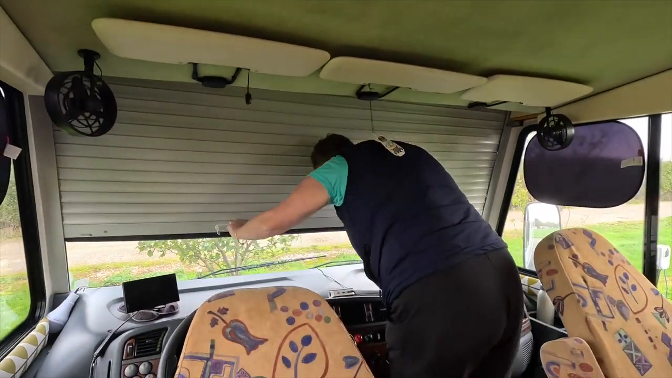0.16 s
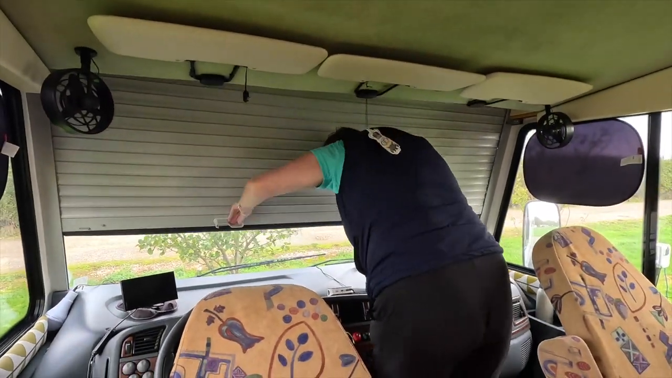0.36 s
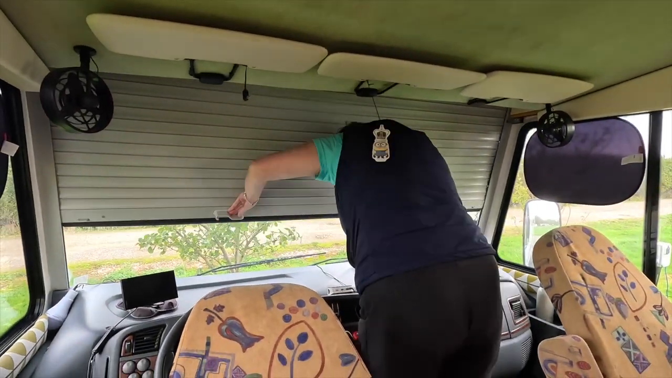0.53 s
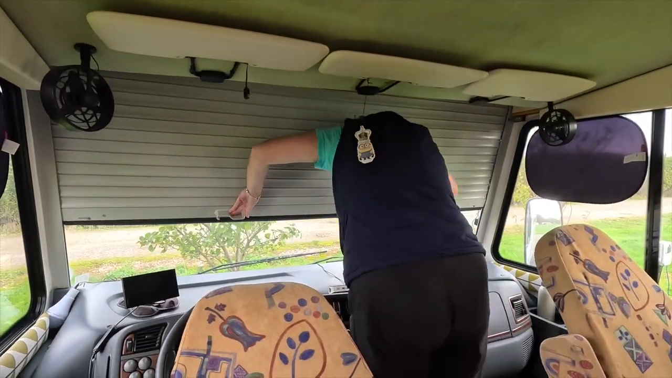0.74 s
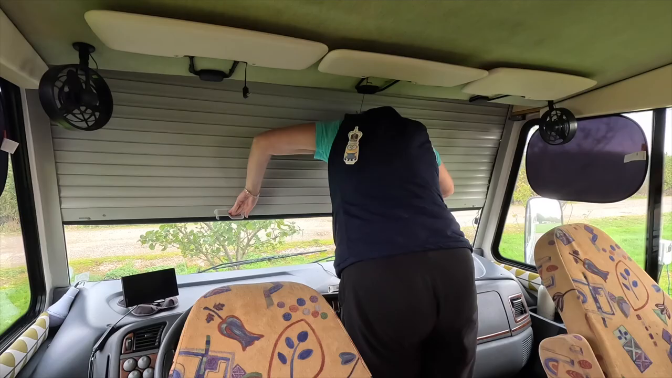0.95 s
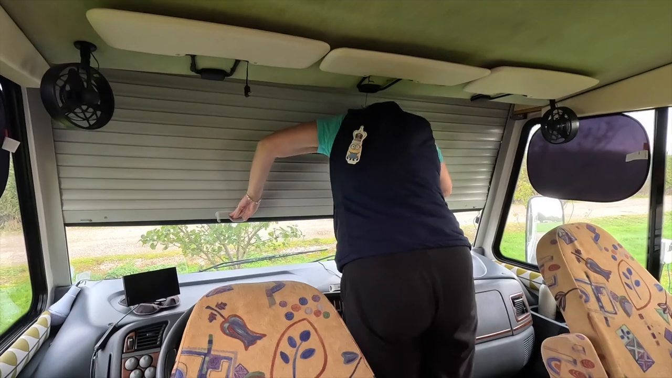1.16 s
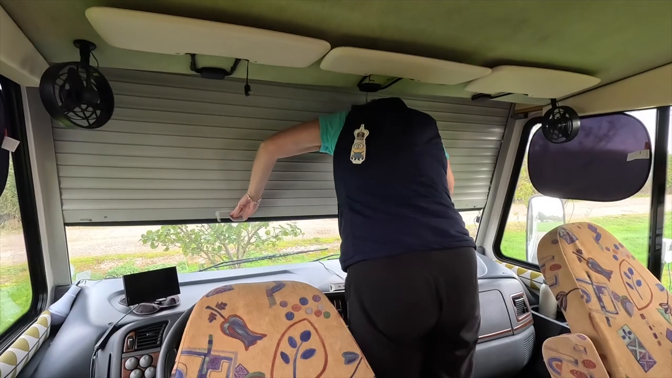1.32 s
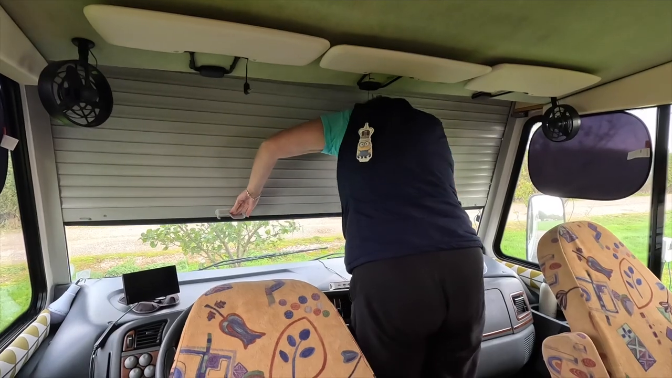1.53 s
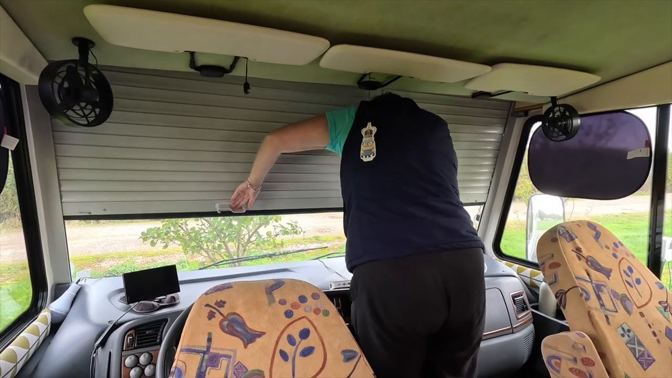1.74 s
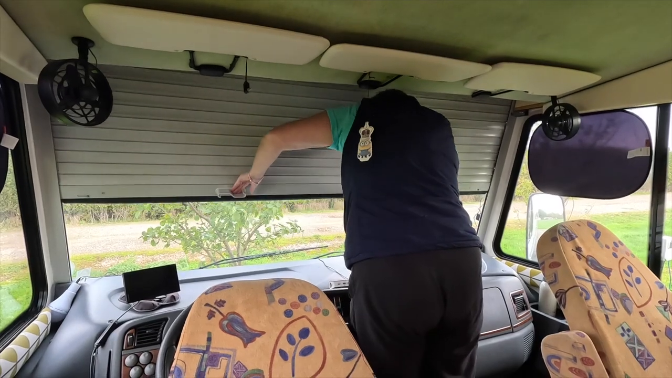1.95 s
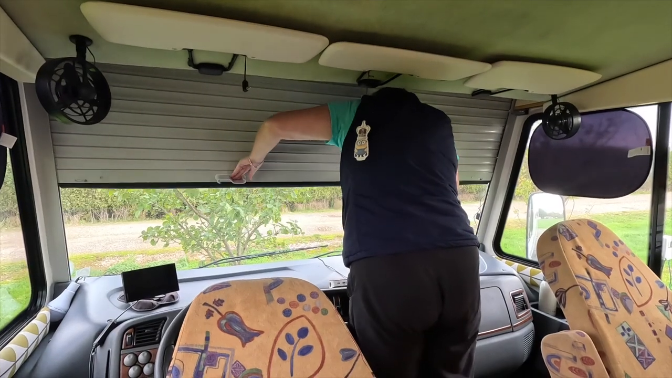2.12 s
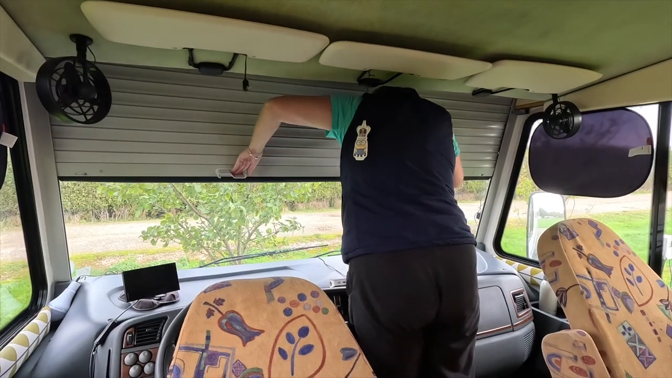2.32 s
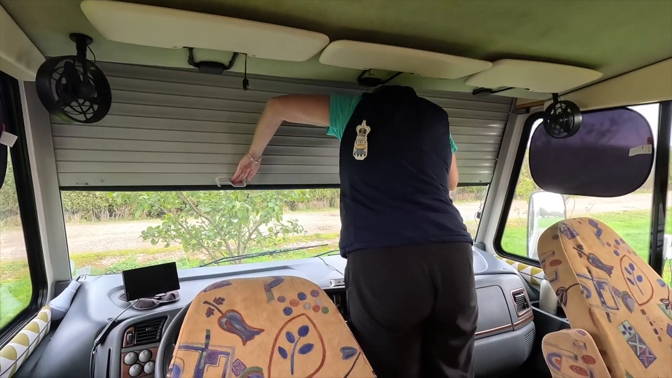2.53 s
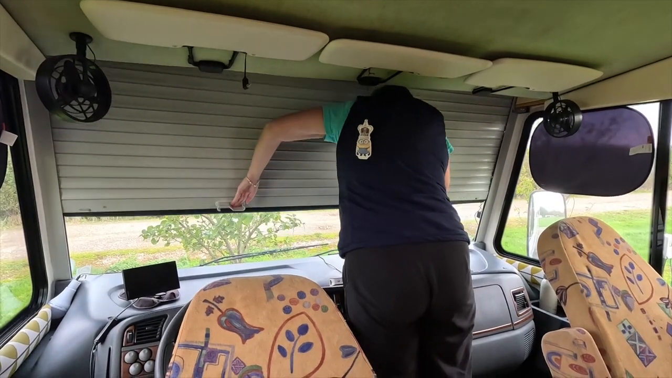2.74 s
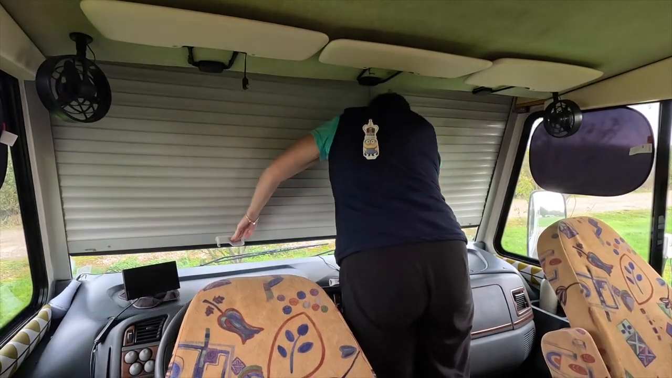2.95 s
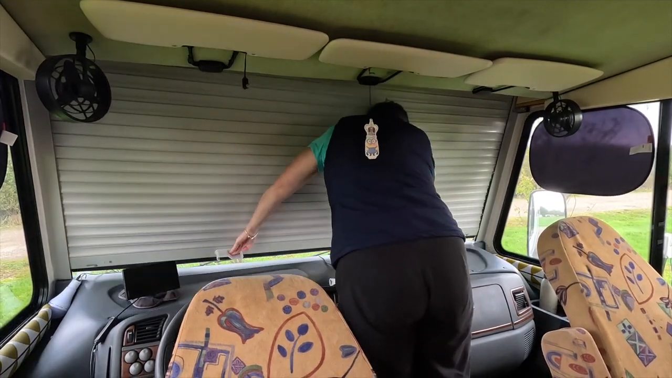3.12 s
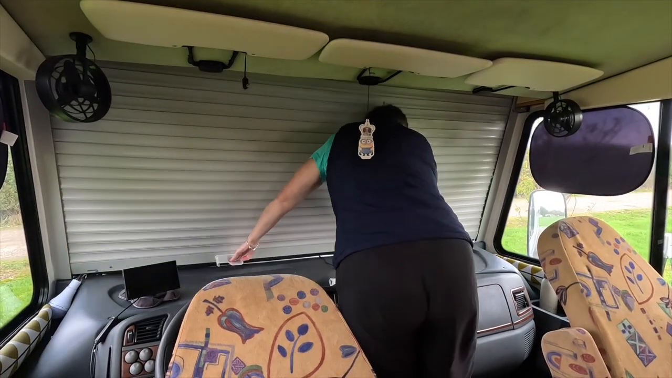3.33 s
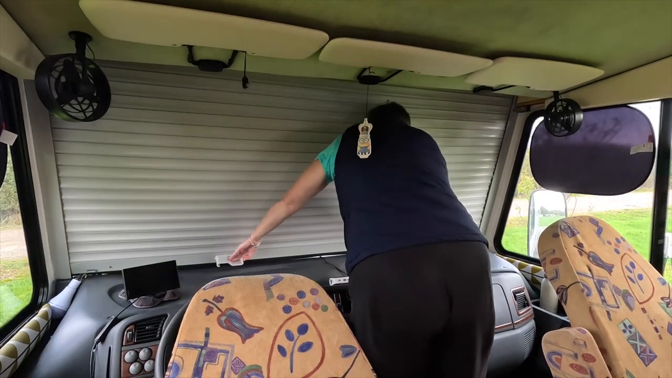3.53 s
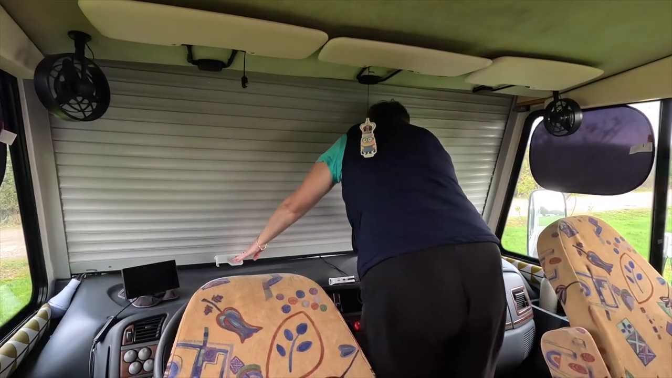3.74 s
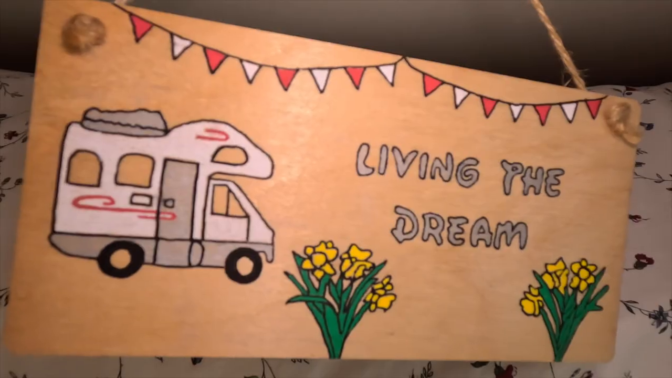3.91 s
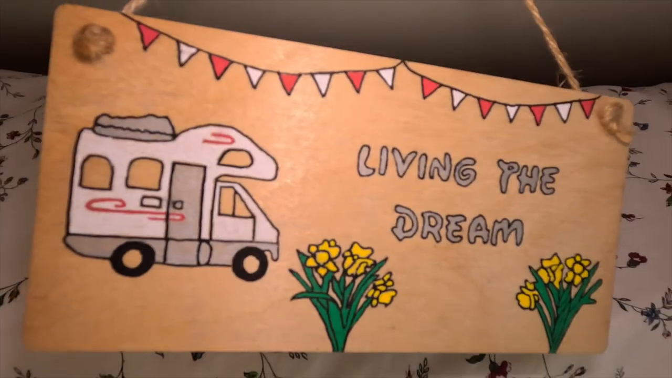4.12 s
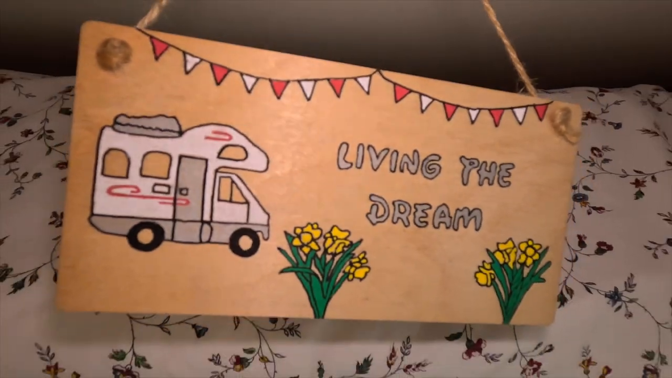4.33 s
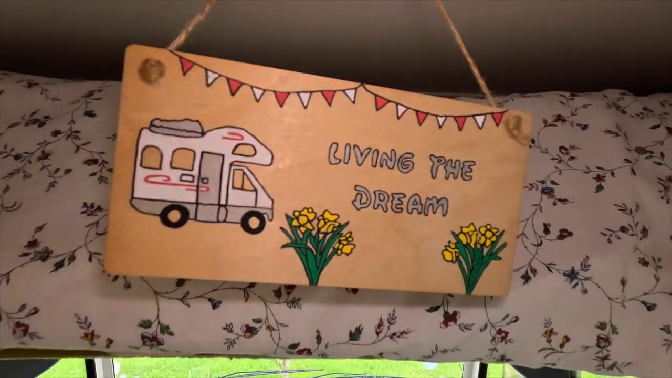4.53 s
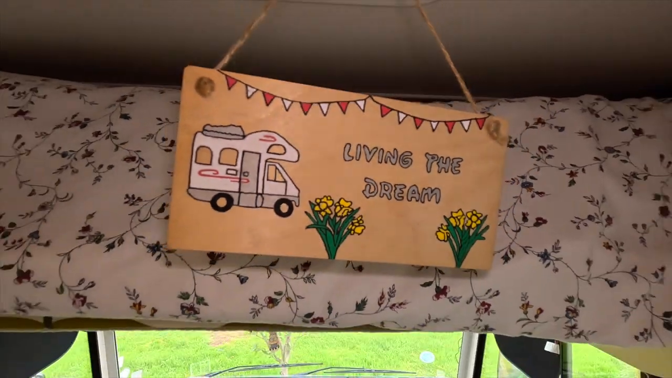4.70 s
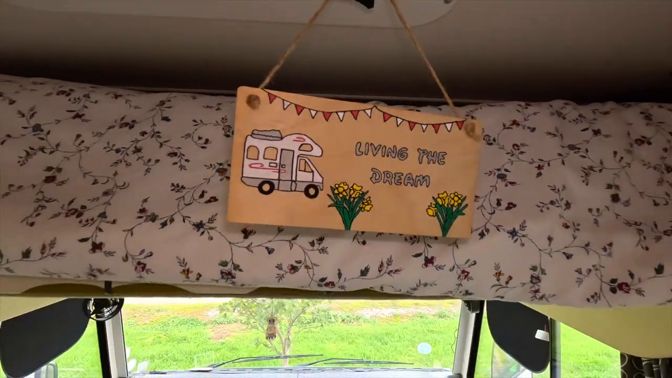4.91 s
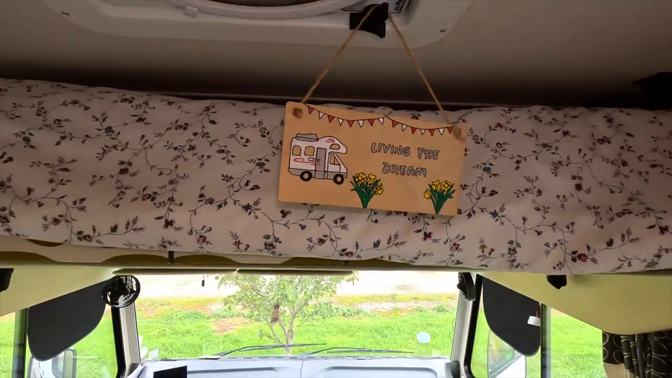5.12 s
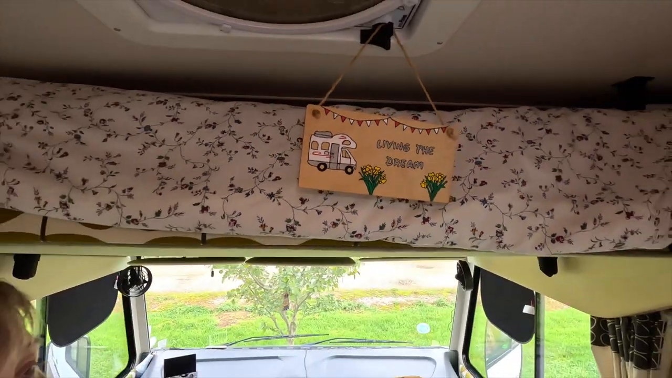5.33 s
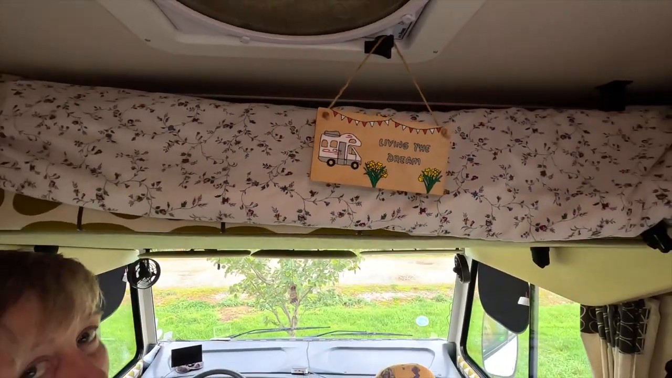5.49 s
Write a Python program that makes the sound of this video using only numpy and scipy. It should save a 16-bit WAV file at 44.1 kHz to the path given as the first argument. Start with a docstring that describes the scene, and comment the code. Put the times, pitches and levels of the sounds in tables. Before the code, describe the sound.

Inside a camper cab, a roller blind's slats clatter and scrape with hollow thumps, stopping abruptly before faint bumps and cloth rustle.

```python
"""A hand works a slatted roller blind up and down in a vehicle cab, a little way off.
Slats clack, scrape and rattle in their guides; the curtain thumps and booms like a loose panel.
The motion is loudest near 3 s, then hard slat edges snap past the guide in a quick run.
At 3.86 s the blind's sound cuts off, leaving the soft air of the cab.
From 4.5 s come a few soft bumps on padded trim, cloth rustles and two faint clacks."""
import sys
import numpy as np
from scipy import signal
from scipy.io import wavfile
from scipy.ndimage import uniform_filter1d

SR = 44100
rng = np.random.default_rng(int(sys.argv[2]) if len(sys.argv) > 2 else 0)


def wav_out(sig):
    """Save sig, one row per channel (or a flat mono array), as 16-bit PCM at SR to the path in sys.argv[1]."""
    wavfile.write(sys.argv[1], SR, np.round(np.clip(np.atleast_2d(sig).T, -1, 1) * 32767).astype(np.int16))


N = 249606
CUT_S, BAND_LIMIT_HZ = 3.863, 15500

# blind in motion: (time [s], curtain boom [dB], slat rattle [dB])
BLIND_TRAVEL = [(0, -42, -46.5), (0.24, -50, -54.5), (0.35, -42.5, -49), (0.47, -30.5, -39.5),
                (0.64, -43.5, -49), (1.1, -41.5, -46.5), (1.2, -47, -60), (1.28, -43, -49),
                (1.52, -43.5, -48.5), (1.62, -47, -53.5), (1.84, -35.5, -36.5), (1.95, -33, -43),
                (2.26, -31, -44), (2.37, -49, -50), (2.44, -48, -51), (2.58, -31, -37.5), (2.8, -24.5, -31),
                (3.1, -25.5, -36), (3.23, -35, -39), (3.302, -27, -38), (3.36, -44.5, -49.5),
                (3.56, -41, -41.5), (3.8, -54.5, -61)]
# slat knocks: (time [s], level [dB], centre [Hz], chatter t60 [s])
SLAT_CLACKS = [(0.03, -44, 3750, 0.11), (0.139, -47, 3000, 0.08), (0.157, -37, 2170, 0.018),
               (0.2535, -32, 3900, 0.08), (0.315, -45, 3557, 0.17), (0.415, -28.5, 2300, 0.17),
               (0.432, -28.5, 3260, 0.083), (0.509, -36.5, 4183, 0.05), (0.643, -43, 5159, 0.091),
               (0.714, -36, 5000, 0.17), (0.892, -36.5, 4700, 0.051), (1.03, -37.5, 1270, 0.032),
               (1.25, -40, 3400, 0.073), (1.294, -42, 3988, 0.076), (1.329, -42, 3500, 0.053),
               (1.374, -47, 3900, 0.08), (1.455, -32.5, 2230, 0.075), (1.482, -36.5, 3470, 0.059),
               (1.658, -39.5, 1610, 0.022), (1.692, -42, 3620, 0.44), (1.79, -37, 2700, 0.12),
               (1.836, -26.5, 1660, 0.065), (1.893, -35.5, 1200, 0.047), (2.055, -35.5, 1940, 0.41),
               (2.26, -34, 3570, 0.064), (2.322, -34, 1330, 0.042), (2.453, -41, 4223, 0.3),
               (2.499, -40, 3839, 0.051), (2.519, -27, 4700, 0.16), (2.681, -25.5, 3900, 0.19),
               (2.71, -28, 3830, 0.04), (2.94, -28, 2570, 0.14), (2.999, -28.5, 3050, 0.072),
               (3.075, -26, 1740, 0.062), (3.145, -35.5, 2361, 0.027), (3.225, -38, 3250, 0.076),
               (3.445, -31, 3150, 0.033), (3.473, -35, 1550, 0.03), (3.539, -31.5, 3630, 0.034),
               (3.605, -29, 2250, 0.026), (3.649, -42, 5300, 0.046), (3.692, -43, 4730, 0.17),
               (3.746, -48.5, 4429, 0.071), (3.817, -28, 2920, 0.023), (5.155, -48, 3800, 0.087),
               (5.299, -52.5, 1773, 0.11)]
# slat scrapes: (time [s], level [dB], centre [Hz], chatter t60 [s])
SLAT_SCRAPES = [(0.48, -41, 4346, 0.23), (0.57, -54, 4183, 0.19), (0.81, -51, 3523, 0.051),
                (1.056, -37.5, 3900, 0.15), (1.085, -30, 4160, 0.041), (1.72, -38, 4750, 0.16),
                (1.86, -37, 3760, 0.056), (1.968, -33, 2210, 0.14), (2.16, -29, 1950, 0.057),
                (2.59, -35, 3580, 0.13), (2.785, -26, 3800, 0.14), (3.832, -40.5, 4700, 0.028),
                (4.51, -53.5, 1660, 0.18), (4.545, -50.5, 1860, 0.62), (4.99, -48, 2208, 0.12)]
# edge snaps: (time [s], level [dB])
EDGE_TICKS = [(0.6523, -40), (0.714, -37.5), (2.5294, -25.5), (2.69, -25.5), (3.2116, -23.5),
              (3.2482, -23.5), (3.264, -25), (3.2748, -27), (3.2829, -27.5), (3.2916, -28), (3.3284, -43)]
# blows on the curtain: (time [s], level [dB], centre [Hz], chatter t60 [s])
CURTAIN_THUMPS = [(0.192, -44.5, 188, 0.5), (0.256, -30, 163, 0.019), (0.411, -13.5, 330, 0.089),
                  (0.435, -22.5, 184, 0.08), (0.51, -29, 262, 0.16), (1.092, -33.5, 790, 0.095),
                  (1.252, -36, 190, 0.05), (1.457, -27, 460, 0.062), (1.79, -29, 394, 0.048),
                  (1.812, -24, 390, 0.19), (1.836, -18.5, 161, 0.068), (2.0, -20.5, 206, 0.055),
                  (2.21, -30, 499, 0.11), (2.322, -31, 635, 0.086), (2.465, -34.5, 694, 0.23),
                  (2.523, -35, 167, 0.063), (2.61, -25.5, 346, 0.078), (2.79, -21.5, 500, 0.1),
                  (2.86, -25, 315, 0.29), (2.95, -23, 170, 0.11), (3.07, -17, 229, 0.077),
                  (3.135, -22, 360, 0.12), (3.185, -20.5, 364, 0.12), (3.443, -31.5, 314, 0.06),
                  (3.475, -35, 515, 0.13), (3.82, -37, 400, 0.07)]
# bumps on the trim: (time [s], level [dB], centre [Hz], chatter t60 [s])
TRIM_BUMPS = [(4.515, -37.5, 200, 0.12), (4.549, -34, 167, 0.12), (4.6, -48, 110, 0.15),
              (4.827, -40, 180, 0.054), (4.912, -42, 150, 0.26), (4.99, -42.5, 350, 0.12),
              (5.143, -34.5, 203, 0.075), (5.17, -48, 120, 0.2)]
# ring of one slat: (frequency [Hz], level [dB], base t60 [s])
SLAT_MODES = [(1238, 5, 0.098), (1650, 16, 0.0081), (1998, 8, 0.037), (2100, 16.5, 0.011), (2709, 0, 0.084),
              (2963, 3, 0.039), (3524, 5, 0.034), (3706, 17, 0.0083), (4113, -7, 0.085), (4384, 4.5, 0.013),
              (5970, 0, 0.017), (5520, 7, 0.0095), (6040, -24, 0.0047), (6360, 0.5, 0.0069),
              (7280, 1, 0.0054)]
# ring of the curtain: (frequency [Hz], level [dB], base t60 [s])
CURTAIN_MODES = [(79, -21, 0.088), (95, 0, 0.033), (161, 2.5, 0.093), (173.1, -0.5, 0.28),
                 (229, -2.5, 0.068), (297, 18, 0.051), (372.6, 15, 0.036), (407.6, 8.5, 0.028),
                 (426, -25, 0.083), (518.3, 11, 0.058), (515, 6.5, 0.13), (737, -12.5, 0.023),
                 (887, 0.5, 0.028)]
# ring of padded trim: (frequency [Hz], level [dB], base t60 [s])
TRIM_MODES = [(75, 4, 0.071), (104, 0, 0.05), (150, 3, 0.044), (190, 1.5, 0.05), (240, -0.5, 0.035),
              (321, 1, 0.043), (436, 1, 0.029), (606, -4, 0.025)]
# bare slat contact: (frequency [Hz], density [dB])
CONTACT_SPECTRUM = [(400, -19.5), (900, 3.5), (2000, 7), (4200, 5.5), (5500, -0.5), (7500, -1.5),
                    (11000, -7.5), (15000, -24.5)]
# broad panel motion: (frequency [Hz], density [dB])
PANEL_SPECTRUM = [(15, -52), (25, -19.5), (145, -2.5), (357, -5.5), (468, -9), (514, -7), (663, -9.5),
                  (1100, -17.5), (1430, -40.5), (2420, -120)]
# still air: (frequency [Hz], density [dB])
AIR_SPECTRUM = [(18, -32), (55, 11), (110, 5), (200, 2), (350, 2), (1000, -8), (2500, -19), (5000, -32),
                (8000, -34.5), (15000, -44)]
# air and rustle: (time [s], level [dB], tilt above 500 Hz [dB/octave])
AIR_CURVE = [(3.87, -55.5, 2.5), (4.138, -56.5, 3), (4.4, -58.5, 4.5), (4.568, -54, 3.5), (4.676, -57.5, 6),
             (5.03, -54, 6), (5.33, -58, 6), (5.66, -54.5, 5)]
# housed microphone, treble notch: (frequency [Hz], gain [dB])
MIC_RESPONSE = [(15, -49), (32, -2), (55, -1), (4300, 1), (5000, 0.5), (7200, -5.5), (8600, -16),
                (9050, -23.5), (9500, -15), (11200, -16.5), (12000, -24), (15000, -29)]


def moving_blind():
    """Curtain boom, slat rattle and dry grit in the guides follow the hand."""
    times_s, boom_db, rattle_db = np.transpose(BLIND_TRAVEL)
    t = np.arange(N) / SR
    boom_db, rattle_db = np.interp(t, times_s, boom_db), np.interp(t, times_s, rattle_db)
    boom = shaken(CURTAIN_MODES, PANEL_SPECTRUM, bare_db=-3, focus_db=3.2, gust_db=0.85,
                  rate_hz=100, spread_db=2.35, rub=0.85, damping=0.83)
    rattle = shaken(SLAT_MODES, CONTACT_SPECTRUM, bare_db=-2.4, focus_db=3, gust_db=4.8,
                    rate_hz=400, spread_db=5.3, rub=1, damping=4.2)
    grains = contacts(N, rate_hz=49, spread_db=1.8, rub=1.7) * gain(0.5 * wander(rate_hz=41))
    grit = unit_rms(highpass(grains, 6500)) * gain(0.57 * rattle_db - 26)
    return boom * gain(boom_db) + rattle * gain(rattle_db) + grit


def slat_clacks():
    """Slats knock together; stronger blows ring more clearly."""
    return blows(SLAT_CLACKS, SLAT_MODES, CONTACT_SPECTRUM, rise_s=0.00073, strike=3.8,
                 rate_hz=2500, spread_db=1.4, rub=0.26, focus_db=23, damping=3,
                 bare_db=5.5, bare_db_per_oct=5.5, bare_db_per_db=-0.58)


def curtain_thumps():
    """Dull blows ring the curtain like a panel."""
    return blows(CURTAIN_THUMPS, CURTAIN_MODES, PANEL_SPECTRUM, rise_s=0.00266, strike=6.2,
                 rate_hz=500, spread_db=2.5, rub=0.97, focus_db=27.6, damping=1.02,
                 bare_db=3.5, bare_db_per_oct=5.5)


def slat_scrapes():
    """Short rubs swell without a strike."""
    return blows(SLAT_SCRAPES, SLAT_MODES, CONTACT_SPECTRUM, rise_s=0.0066, strike=0,
                 rate_hz=2500, spread_db=0.9, rub=0.51, focus_db=8.7, damping=1.4,
                 bare_db=-0.5, bare_db_per_oct=5.5, bare_db_per_db=-0.58)


def edge_ticks(centre_hz=6300, t60_s=0.021):
    """Hard slat edges snap past the guide."""
    events = [(time_s, level_db, centre_hz, t60_s) for time_s, level_db in EDGE_TICKS]
    return blows(events, SLAT_MODES, CONTACT_SPECTRUM, rise_s=0.0003, strike=13.4,
                 rate_hz=4300, spread_db=1.5, rub=0.95, focus_db=32, damping=1, bare_db=7.5)


def trim_bumps():
    """Soft blows give padded trim a dull ring."""
    return blows(TRIM_BUMPS, TRIM_MODES, PANEL_SPECTRUM, rise_s=0.0047, strike=1,
                 rate_hz=500, spread_db=2.6, rub=1.1, focus_db=10.4, damping=0.88, bare_db=-7)


def blows(events, modes, spectrum, rise_s, strike, rate_hz, spread_db, rub, focus_db, damping,
          bare_db, bare_db_per_oct=0, bare_db_per_db=0):
    """A strike and dying chatter drive detuned modes plus bare contact noise."""
    out, t = np.zeros(N), np.arange(SR // 5) / SR
    bare = bare_impulse(spectrum)
    middle_hz = np.sqrt(modes[0][0] * modes[-1][0])
    for time_s, level_db, centre_hz, t60_s in events:
        envelope = gain(-60 * t / t60_s) * (1 - np.exp(-t / rise_s)) ** 2
        envelope *= 1 + 0.073 * gain(45 * t / t60_s)  # loose neighbours settle more slowly
        chatter = envelope * contacts(len(t), rate_hz, spread_db, rub)
        chatter[round(rise_s * SR)] += strike
        ringing = ring(modes, centre_hz, focus_db, damping, detune=0.041)
        contact_db = bare_db + bare_db_per_oct * np.log2(centre_hz / middle_hz)
        contact_db += bare_db_per_db * (level_db + 45)
        contact = gain(contact_db) * highpass(bare, 0.28 * centre_hz)
        sound = signal.oaconvolve(chatter, ringing + contact)
        peak_rms = np.sqrt(uniform_filter1d(sound ** 2, 180).max())
        span = out[round(time_s * SR):][:len(sound)]
        span += gain(level_db) * sound[:len(span)] / peak_rms
    return out


def shaken(modes, spectrum, bare_db, focus_db, gust_db, rate_hz, spread_db, rub, damping):
    """Ten parts of different pitch, struck at random, each surging as slats pass the roll."""
    out = np.zeros(N)
    contact = gain(bare_db) * bare_impulse(spectrum)
    for centre_hz in np.geomspace(modes[0][0], modes[-1][0], 10):
        drive = contacts(N, rate_hz, spread_db, rub) * gain(gust_db * wander(rate_hz=24.81))
        ringing = ring(modes, centre_hz, focus_db, damping, detune=0.093)
        out += signal.oaconvolve(drive, gain_at(spectrum, centre_hz) * ringing + contact)[:N]
    return unit_rms(out)


def ring(modes, centre_hz, focus_db, damping, detune):
    """Dying sines, focus_db weaker per squared octave off centre; damping divides t60."""
    hz, db, t60_s = np.transpose(modes)[:, :, None]
    hz = hz * (1 + detune * rng.standard_normal(hz.shape))
    t = np.arange(4096) / SR
    db = db - focus_db * np.log2(hz / centre_hz) ** 2 - 60 * t * damping / t60_s
    onset = 1 - np.exp(-t * centre_hz * 2.67)  # contact lasts about a cycle
    polarity = (-1.) ** np.arange(len(hz))[:, None]  # avoids gaps between modes
    sines = polarity * gain(db) * np.sin(2 * np.pi * hz * t)
    return unit_rms(onset * sines.sum(0)) / 64  # unit energy


def contacts(size, rate_hz, spread_db, rub):
    """Small uneven impacts over rubbing noise."""
    struck = rng.random(size) < rate_hz / SR
    noise = rng.standard_normal(size)
    strength = gain(spread_db * np.minimum(rng.exponential(1, size), 4))
    return unit_rms(unit_rms(struck * np.sign(noise) * strength) + rub * noise)


def bare_impulse(spectrum):
    """One contact without ring, at unit energy."""
    return unit_rms(coloured(np.arange(4096) == 0, spectrum)) / 64


def cab_reverb(x, low_t60_s=0.13, wet_db=-16):
    """Padded cab: sparse reflections, duller as they die."""
    t = np.arange(SR // 3) / SR
    taps = np.sign(rng.standard_normal(len(t))) * (rng.random(len(t)) < 0.07) * (t > 0.003)
    low = signal.lfilter([0.2], [1, -0.8], taps)
    decay_db = -60 * t / low_t60_s
    tail = low * gain(decay_db) + (taps - low) * gain(decay_db / 0.51)
    return x + gain(wet_db) * signal.oaconvolve(x, tail / np.linalg.norm(tail))[:N]


def cab_air():
    """Soft cab noise; cloth moving nearby brightens it."""
    times_s, level_db, tilt_db_per_oct = np.transpose(AIR_CURVE)
    noise = unit_rms(coloured(rng.standard_normal(N), AIR_SPECTRUM))
    hz, t, bins = signal.stft(noise, SR, nperseg=512)
    octaves = np.log2(np.maximum(hz, 500) / 500)[:, None]
    bins *= gain(np.interp(t, times_s, level_db) + octaves * np.interp(t, times_s, tilt_db_per_oct))
    return signal.istft(bins, SR, nperseg=512)[1][:N]


def gain(db):
    return 10 ** (db / 20)


def unit_rms(x):
    return x / np.sqrt(np.mean(x ** 2) + 1e-20)


def highpass(x, hz):
    return signal.lfilter(*signal.butter(2, hz, 'high', fs=SR), x)


def wander(rate_hz):
    """Random values joined by ramps."""
    return np.interp(np.arange(N) / SR * rate_hz, np.arange(2000), rng.standard_normal(2000))


def gain_at(spectrum, hz):
    """Spectrum gain, interpolated in log frequency."""
    points_hz, db = np.transpose(spectrum)
    return gain(np.interp(np.log(hz + 1), np.log(points_hz + 1), db))


def coloured(x, spectrum):
    """Minimum-phase filter."""
    log_gain = np.log(gain_at(spectrum, abs(np.fft.fftfreq(4096, 1 / SR))))
    taps = np.fft.ifft(np.exp(np.conj(signal.hilbert(log_gain)))).real[:2048]
    return signal.oaconvolve(x, taps)[:len(x)]


def scene():
    """Blind and blows cut off at CUT_S, tails included; later blows and the air go on."""
    slats = slat_clacks() + slat_scrapes()
    crisp_top = gain(-3) * highpass(slats, 7580)
    hits = slats + crisp_top + curtain_thumps() + edge_ticks() + trim_bumps()
    t = np.arange(N) / SR
    before_cut = t < CUT_S
    fade = np.clip((CUT_S - t) / 0.0016, 0, 1)
    busy = fade * cab_reverb(before_cut * (hits + moving_blind()))
    quiet = cab_reverb(~before_cut * hits)
    return (busy + quiet + cab_air())[None]


def record(dry):
    """Microphone colour, then band limit."""
    lowpass = signal.firwin(511, BAND_LIMIT_HZ, window=("kaiser", 9), fs=SR)
    return signal.oaconvolve(coloured(dry[0], MIC_RESPONSE), lowpass, "same")[None]


dry = scene()
out = record(dry)
wav_out(out)
```